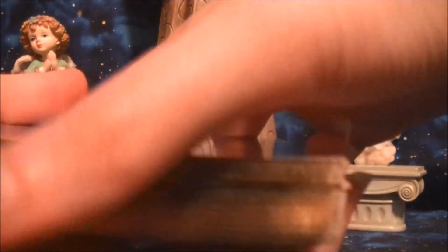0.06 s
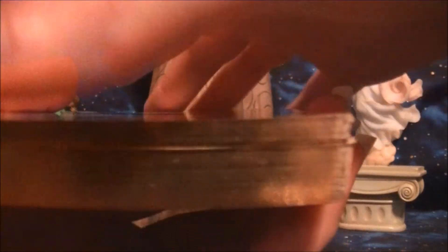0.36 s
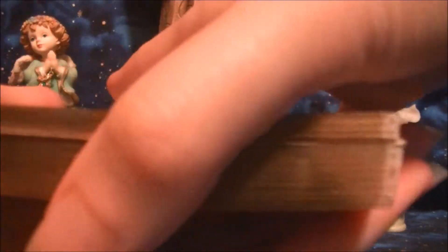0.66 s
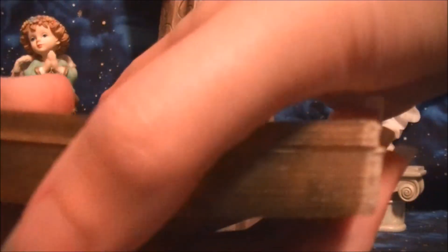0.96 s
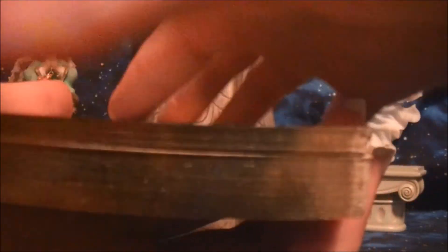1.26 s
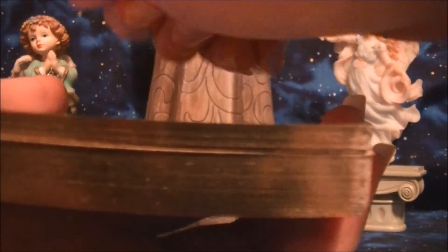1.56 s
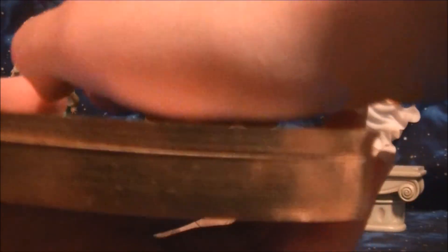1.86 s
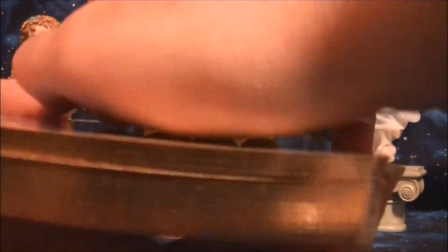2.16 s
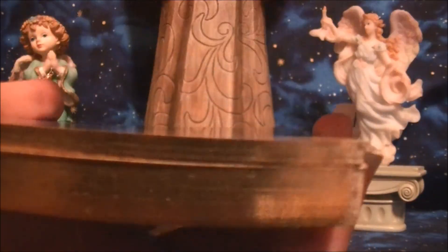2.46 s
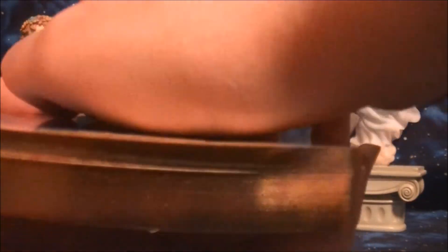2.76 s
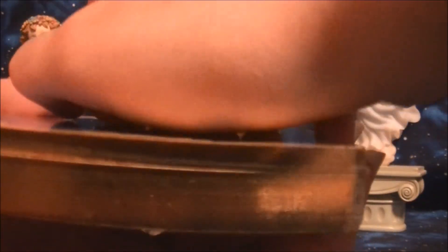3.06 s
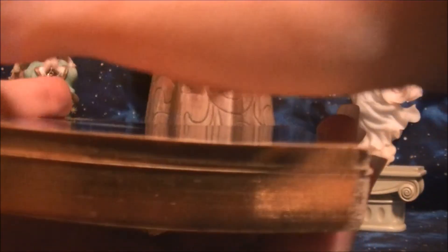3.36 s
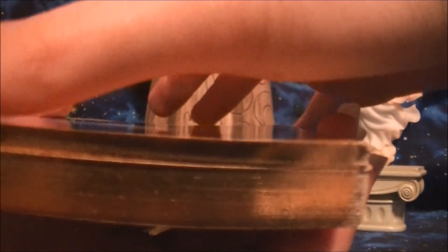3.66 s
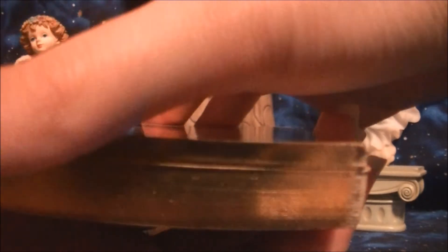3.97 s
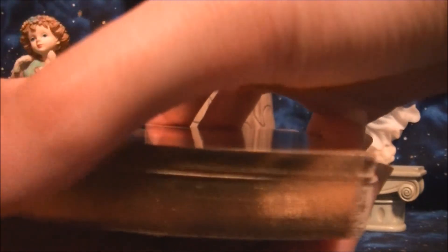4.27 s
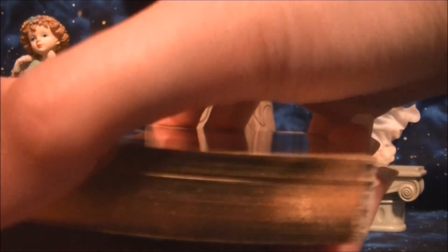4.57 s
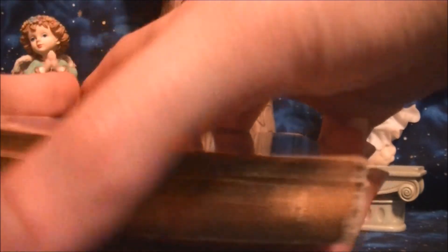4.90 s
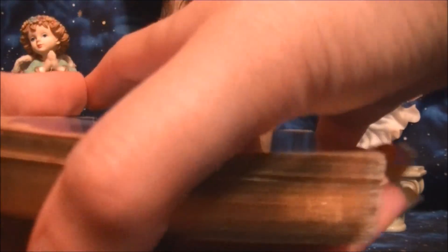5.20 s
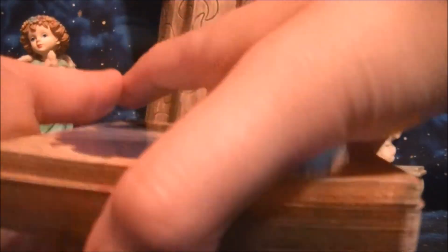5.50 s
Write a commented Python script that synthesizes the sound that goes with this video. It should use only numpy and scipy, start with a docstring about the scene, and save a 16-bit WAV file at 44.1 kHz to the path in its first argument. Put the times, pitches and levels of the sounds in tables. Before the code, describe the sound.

In a small, quiet room with a faint hum and a thin motor whirr, hands handle a deck of cards right by the microphone. Brief hissy finger slips and soft taps come first, then a bright nail click. About halfway, a single hard knuckle knock on the deck stands out as the loudest sound. After it come only light, scattered touches and slight squeaks of skin on card.

```python
"""A small, quiet room, with a thick deck of cards held close to the microphone.
Fingers tap softly, slip and squeak on the cards, and a nail ticks on an edge. At 2.6 s the knuckles
land in one hard, ragged knock that rings the deck and sets the hand bobbing. The grip rumbles faintly.
Behind the hands are mains hum, a faint fan, a thin motor whirr and the room's short echo."""
import sys
import numpy as np
from scipy import signal
from scipy.fft import rfft, irfft
from scipy.io import wavfile

SR = 44100
rng = np.random.default_rng(int(sys.argv[2]) if len(sys.argv) > 2 else 0)


def digitize_waveform(pressure):
    """Quantize a signal to 16-bit integers and store it at the path in sys.argv[1].

    Rows of a 2-D input are taken as channels; values are limited to [-1, 1].
    """
    field = np.atleast_2d(pressure).T
    bounded = np.clip(field, -1, 1)
    quanta = np.round(bounded * 32767).astype(np.int16)
    wavfile.write(sys.argv[1], SR, quanta)


N = 253134

# fan and room resonances: pitch_hz, width_hz, level_db
FAN_TONES = [(208, 14.5, -65), (246, 11.4, -67), (360.6, 8.2, -72.5), (888, 20, -71.5), (957, 22, -72.5)]
# the rush of room air: frequency_hz, relative_db
AIR_SPECTRUM = [(12, -47), (20, -34), (65, -14.5), (91, -14.5), (123, -5), (142, -9), (168, -7),
                (222, -10.5), (293, -10.5), (802, -13.5), (949, -16), (1060, -16), (7730, -27.5),
                (13900, -32), (16000, -41)]
# how alike the air is in left and right: frequency_hz, correlation
AIR_LIKENESS = [(40, 0.25), (130, -0.095), (290, -0.48), (640, -0.36), (1400, -0.37), (3100, -0.18),
                (7000, 0.16), (15000, 0.12)]
# the grip shifting on the deck: peak_s, length_s, level_db
GRIP_SHIFTS = [(0.03, .55, -66), (4.83, .75, -61.5), (5.7, .4, -68)]
# the grip's low rumble: frequency_hz, relative_db
GRIP_SPECTRUM = [(20, -28), (55, -7), (100, -2), (250, -11.5), (400, -0.5), (550, -6.5), (750, -4.5),
                 (1100, -21), (3000, -42)]
# runs of a tiny motor: start_s, stop_s, level_db
MOTOR_RUNS = [(0.02, 2.1, -63.5), (4.66, 7, -64.5)]
# the motor's housing: pitch_hz, relative_db, t60_s
HOUSING_MODES = [(1010, -4.5, 0.006), (2100, 3.5, 0.0032), (3000, 2, 0.0051), (3870, -4, 0.012),
                 (5170, -6.5, 0.0056), (6740, -10, 0.017)]
# a fingertip squeaking on glossy card: peak_s, pitch_hz, length_s, level_db
SQUEAKS = [(0.123, 1460, .07, -58.5), (2.254, 1430, 0.0095, -60), (3.277, 1430, 0.022, -72),
           (3.280, 3160, .028, -65.5), (3.966, 1334, .055, -62.5), (4.908, 1400, 0.022, -59),
           (4.987, 1440, 0.02, -58)]
# skin slipping on the cards: peak_s, length_s, level_db, flatness (0 fingertip to 1 whole pad)
SLIPS = [(0.124, 0.068, -56, 0.45), (0.162, .019, -37.5, .16), (0.591, .03, -53.5, 0.59),
         (0.657, 0.066, -55.5, 0.82), (0.929, 0.022, -46.5, 0.44), (1.025, 0.042, -62.5, 0.76),
         (1.265, 0.015, -35.5, 0.074), (1.748, .08, -65.5, .1), (2.589, 0.025, -52.5, 0.25),
         (3.313, .036, -57, .1), (3.954, 0.046, -54.5, 0.57), (4.722, 0.012, -57, 1),
         (4.907, 0.029, -50, 0.19), (4.978, 0.021, -48.5, 0.31), (5.15, 0.15, -64, .22),
         (5.475, 0.097, -52.5, 0.62), (5.578, 0.11, -56.5, 0.33)]
# a finger landing softly: start_s, t60_s, level_db, flatness
TAPS = [(0.523, .08, -43.5, .44), (0.6307, .016, -42.5, .98), (0.919, 0.065, -41, .6),
        (3.493, .014, -50, .85), (3.926, .07, -46.5, .55), (4.885, 0.073, -46.5, 0.26)]
# a fingertip's hiss on card: frequency_hz, relative_db
HISS_SPECTRUM = [(150, -30), (500, -14), (1300, -20), (2400, -16.5), (3200, -11), (4200, -7), (5900, 0.5),
                 (7300, 0.5), (8600, -3.5), (11800, -6.5), (15000, -14), (16000, -25)]
# a flat pad's dull rub: frequency_hz, relative_db
RUB_SPECTRUM = [(150, -20), (400, -9), (750, 2), (1200, -1), (1950, 1), (2500, -5), (3150, -3.5),
                (4200, -3), (7000, -19), (16000, -39)]
# the hollow under the palm: pitch_hz, relative_db, t60_s
HOLLOW_MODES = [(1210, -5, 0.011), (1370, -6, 0.027), (1570, -14, 0.0161)]
# a nail catching a card edge: start_s, force_db
NAIL_TICKS = [(0.1455, -17), (0.6312, -36), (1.8789, 2.5), (4.8625, -28.5), (5.4945, -31), (5.5280, -29)]
# the card edge ringing: pitch_hz, gain_db, t60_s
EDGE_MODES = [(910, -18, .004), (2680, -24, .003), (3250, -32, 0.0047), (4400, -29, 0.0031),
              (5100, -26, 0.0037), (5900, -18, 0.0027), (6650, -24, .003), (8900, -17, 0.0025),
              (10100, -17.5, 0.0015)]
# knuckles landing in a ragged run: start_s, force_db
KNUCKLES = [(2.6042, 0.5), (2.605, 1.5), (2.60655, 0.2), (2.6104, -1), (2.6131, -1.5)]
# the deck ringing in the hand: pitch_hz, gain_db, t60_s
DECK_MODES = [(163, -24.3, 0.035), (310, -37, 0.07), (490, -30.5, 0.055), (816, -13, 0.017),
              (1070, 0.5, 0.011), (1320, -6, 0.011), (1500, -8.5, .012), (2220, -26, .009),
              (3050, -21, .012), (3694, -36, 0.0046), (4300, -23.5, 0.0078), (4660, -21.5, 0.0064),
              (5300, -20, 0.0034), (5900, -20, 0.0054), (6810, -20, 0.0074), (7230, -36, 0.0052),
              (8860, -29, .006), (9520, -22.5, 0.004), (11660, -16, 0.0016)]
# the holding hand swaying under the blow: start_s, pitch_hz, force_db, t60_s
HAND_SWAY = [(2.607, 86, -34, 0.3), (2.63, 44, -30, 0.17)]
# the room's echo by band: low_hz, high_hz, gain_db, t60_s
ECHO_BANDS = [(100, 650, -13.5, 0.23), (600, 2000, -28.5, .18), (2020, 5300, -18.5, 0.16),
              (7950, 16000, -16.5, 0.19)]


def from_db(db):
    """Decibels to gain."""
    return 10 ** (np.asarray(db) / 20)


def rms_one(x):
    """Scale to rms 1."""
    return x / np.sqrt(np.mean(x ** 2) + 1e-20)


def by_bin(points):
    """A table over log frequency, read at every FFT bin."""
    hz, value = np.transpose(points)
    return np.interp(np.log(np.fft.rfftfreq(N, 1 / SR) + 1), np.log(hz), value)


def coloured(x, spectrum):
    """Give noise a spectrum, at rms 1."""
    return rms_one(irfft(rfft(x) * from_db(by_bin(spectrum)), N))


def butter(x, hz, kind):
    """Butterworth filter with slopes of 12 dB an octave."""
    return signal.sosfilt(signal.butter(2, hz, kind, fs=SR, output="sos"), x + 1e-18)


def stereo(mid, side, likeness):
    """Left and right from two unrelated signals; likeness is their correlation."""
    spread = np.sqrt(1 - likeness) * side * np.array([[1], [-1]])
    return (np.sqrt(1 + likeness) * mid + spread) / np.sqrt(2)


def clicks(times, levels_db):
    """One impulse for each contact."""
    out = np.zeros(N)
    np.add.at(out, np.round(np.asarray(times) * SR).astype(int), from_db(levels_db))
    return out


def ring(force, modes):
    """Each impulse sets every mode ringing as a damped sine."""
    out = 0
    for hz, gain_db, t60 in modes:
        radius, angle = np.exp(-np.log(1000) / (t60 * SR)), 2 * np.pi * hz / SR
        feedback = [1, -2 * radius * np.cos(angle), radius ** 2]
        out = out + from_db(gain_db) * signal.lfilter([0, np.sin(angle)], feedback, force + 1e-18)
    return out


def dying_noise(t60):
    """Two unrelated noises that die away, each of unit energy."""
    t = np.arange(SR // 2) / SR
    burst = rng.standard_normal((2, len(t))) * np.exp(-np.log(1000) * t / t60)
    return burst / np.sqrt(np.sum(burst ** 2, axis=1, keepdims=True))


def convolve(x, response):
    """Pass a sound through a two-channel response."""
    return signal.fftconvolve(np.atleast_2d(x), response, axes=1)[:, :N]


def swell(peak_s, length_s):
    """Power of one movement: a smooth rise to 1 and an equal fall."""
    t = np.arange(N) / SR - peak_s
    return np.exp(-np.minimum((2 * t / length_s) ** 2, 50))


def swells(times, lengths, gains):
    """Gain of several movements, added in power."""
    return np.sqrt(sum(gain ** 2 * swell(s, length) for s, length, gain in zip(times, lengths, gains)))


def fade(start_s, t60):
    """Power of one contact: 1 at once, then dying away."""
    t = np.arange(N) / SR - start_s
    return (t >= 0) * from_db(-60 * np.clip(t / t60, 0, 2)) ** 2


def micro_slips(per_s, spread_db, likeness):
    """A dense rain of tiny stick-slip releases of uneven size."""
    sizes = from_db(spread_db * np.minimum(rng.exponential(1, (2, N)), 4))
    signs = rng.choice([-1, 1], (2, N))
    released = rng.random((2, N)) < per_s / SR
    return stereo(*rms_one(sizes * signs * released), likeness)


def mains_hum(pitch_hz=120, mean_db=-58, whine_db=-69, peak_s=2.21, beat_s=7.7, beat_depth=0.91):
    """The mains hum swells and fades in one slow beat, under a steady whine on its eighth harmonic."""
    t = np.arange(N) / SR
    phase = 2 * np.pi * pitch_hz * t
    beat = np.sqrt(1 + beat_depth * np.cos(2 * np.pi * (t - peak_s) / beat_s))
    waver_db = 0.5 * rms_one(butter(rng.standard_normal(N), hz=6.3, kind="low"))
    hum = from_db(mean_db + waver_db) * beat * np.sin(phase)
    return np.sqrt(2) * (hum + from_db(whine_db) * np.sin(8 * phase))


def fan():
    """Airflow sounds the narrow resonances of the fan and the room, faint in the background."""
    tones = 0
    for hz, width_hz, db in FAN_TONES:
        flow = stereo(*rng.standard_normal((2, N)), likeness=0.27)
        resonance = signal.iirpeak(hz, hz / width_hz, fs=SR)
        tones = tones + from_db(db) * rms_one(signal.lfilter(*resonance, flow))
    return tones


def room_air(level_db=-54.5):
    """A soft rush of air, wide around the microphone."""
    noise_bins = stereo(*rfft(rng.standard_normal((2, N))), by_bin(AIR_LIKENESS))
    return from_db(level_db) * coloured(irfft(noise_bins, N), AIR_SPECTRUM)


def grip_rumble(rest_db=-73.5):
    """Soft flesh creeping on the deck makes a low rumble that swells whenever the grip shifts."""
    peak_s, length_s, db = np.transpose(GRIP_SHIFTS)
    gain = np.hypot(from_db(rest_db), swells(peak_s, length_s, from_db(db)))
    return gain * coloured(micro_slips(per_s=600, spread_db=2.0, likeness=0.41), GRIP_SPECTRUM)


def motor_whirr(ramp_s=0.062):
    """A tiny motor's fine steps whirr thinly in its housing; it runs, rests and starts again."""
    t = np.arange(N) / SR
    running = sum(from_db(db) * np.clip(np.minimum(t - start, stop - t) / ramp_s, 0, 1)
                  for start, stop, db in MOTOR_RUNS)
    steps = stereo(*rng.standard_normal((2, N)), likeness=0.65)
    return running * rms_one(ring(steps, HOUSING_MODES))


def finger_squeaks(waver_hz=120, waver_depth=0.031):
    """Skin briefly sticks and slips in regular cycles, at an unsteady pitch."""
    waver = 1 + waver_depth * rms_one(butter(rng.standard_normal(N), waver_hz, "low"))
    phase_per_hz = 2 * np.pi * np.cumsum(waver) / SR
    return sum(from_db(db) * np.sqrt(2 * swell(s, length)) * np.sin(hz * phase_per_hz)
               for s, hz, length, db in SQUEAKS)


def slips_and_taps(hollow_touch_db=-14.5, hollow_squeak_db=4, hollow_low_hz=700):
    """Slips swell and fade, taps start at once and die; a fingertip hisses, a flat pad rubs dully."""
    touches = [(from_db(db) ** 2 * swell(s, length), flatness) for s, length, db, flatness in SLIPS]
    touches += [(from_db(db) ** 2 * fade(s, t60), flatness) for s, t60, db, flatness in TAPS]
    power = sum(touch for touch, _ in touches)
    rub_power = sum(touch * flatness ** 2 for touch, flatness in touches)
    # the hollow under the palm answers every touch, and the squeaks more strongly
    squeak_s, _, squeak_length, squeak_db = np.transpose(SQUEAKS)
    squeak_gain = swells(squeak_s, squeak_length, from_db(squeak_db + hollow_squeak_db))
    hollow_gain = np.hypot(from_db(hollow_touch_db) * np.sqrt(power), squeak_gain)
    hiss = coloured(micro_slips(per_s=16000, spread_db=4.5, likeness=0.78), HISS_SPECTRUM)
    hollow = ring(micro_slips(per_s=3600, spread_db=1.0, likeness=0.97), HOLLOW_MODES)
    hollow = rms_one(butter(hollow, hollow_low_hz, "high"))
    rub = coloured(micro_slips(per_s=1600, spread_db=2.0, likeness=0.96), RUB_SPECTRUM)
    return np.sqrt(power - rub_power) * hiss + hollow_gain * hollow + np.sqrt(rub_power) * rub


def room_echo(x, delay_s=0.008):
    """The small room returns a short, soft echo that lasts longest in the bass."""
    tail = sum(from_db(db) * butter(dying_noise(t60), [low, high], "band")
               for low, high, db, t60 in ECHO_BANDS)
    return convolve(x, np.pad(tail, ((0, 0), (round(delay_s * SR), 0))))


def nail_ticks(bright_hz=(3600, 12000), push_hz=(450, 3600), push_db=-17, rustle_db=-15,
               right_lead_s=12e-6):
    """A card edge snaps back off the nail, just right of centre, and stirs its neighbours."""
    catch = clicks(*np.transpose(NAIL_TICKS))
    # a hard, bright flick with only a slight push on the deck
    flick = butter(catch, bright_hz, "band") - from_db(push_db) * butter(catch, push_hz, "band")
    rustle = from_db(rustle_db) * convolve(flick, dying_noise(t60=0.023))
    left, right = ring(flick + rustle, EDGE_MODES)
    t = np.arange(N) / SR
    return np.array([left, np.interp(t + right_lead_s, t, right)])


def knuckle_knock(bone_hz=(3400, 11000), flesh_hz=1600, lowest_hz=140, clap_db=-0.5, slap_db=-10,
                  clap_t60_s=0.011, thud_db=-7.5, thud_lag_s=0.0016, thud_t60_s=0.04):
    """Bone cracks on the deck, flesh pushes it, and the cards clap together, then settle in a patter."""
    start_s, crack_db = np.transpose(KNUCKLES)
    crack = butter(clicks(start_s, crack_db), bone_hz, "band")
    # a dull push follows each crack, ever weaker as the hand's momentum is spent
    push_db = crack_db + thud_db - 60 * (start_s - start_s[0]) / thud_t60_s
    settling = swells(times=[2.633], lengths=[0.027], gains=[from_db(-52)])
    patter = settling * micro_slips(per_s=2300, spread_db=4.0, likeness=0.98)
    thud = butter(clicks(start_s + thud_lag_s, push_db) + patter, flesh_hz, "low")
    clap_power = sum(from_db(db) ** 2 * fade(s, clap_t60_s) for s, db in KNUCKLES)
    clap_gain = np.sqrt(clap_power / fade(0, clap_t60_s).sum())
    clap = butter(clap_gain * stereo(*rng.standard_normal((2, N)), likeness=0.64), bone_hz, "band")
    body = ring(thud + crack + from_db(clap_db) * clap, DECK_MODES)
    # the small deck radiates little bass; air squeezed from between the cards slaps directly
    return butter(body, lowest_hz, "high") + from_db(slap_db) * clap


def hand_sway(softness_hz=110, lowest_hz=32):
    """Hand and deck bob after the knock, a low thump at the microphone."""
    bob = sum(ring(clicks([s], [db]), [(hz, 0, t60)]) for s, hz, db, t60 in HAND_SWAY)
    return butter(butter(bob, softness_hz, "low"), lowest_hz, "high")


def scene(skin_send_db=-4, nail_send_db=-12):
    """Hands and deck close to the microphone, the room behind."""
    knock, skin, nail = knuckle_knock(), slips_and_taps(), nail_ticks()
    echo = room_echo(knock + from_db(skin_send_db) * skin + from_db(nail_send_db) * nail)
    hands = knock + skin + nail + hand_sway() + grip_rumble()
    behind = motor_whirr() + mains_hum() + fan() + room_air()
    return hands + finger_squeaks() + echo + behind


def record(dry, full_scale=0.99, cutoff_hz=15900):
    """The recorder rounds the highest peaks and cuts the top steeply."""
    rounded = dry / (1 + (dry / full_scale) ** 6) ** (1 / 6)
    return signal.sosfilt(signal.ellip(10, .1, 80, cutoff_hz, fs=SR, output="sos"), rounded)


dry = scene()
out = record(dry)
digitize_waveform(out)
```